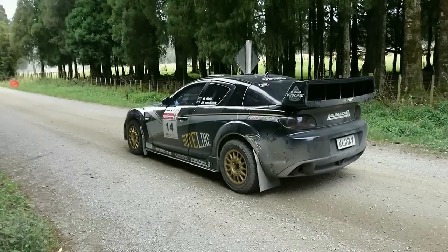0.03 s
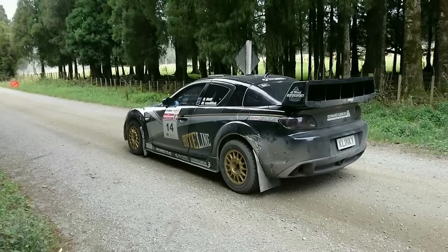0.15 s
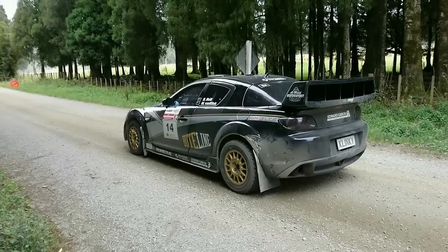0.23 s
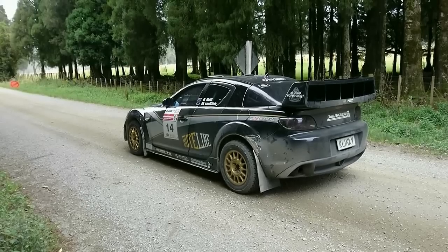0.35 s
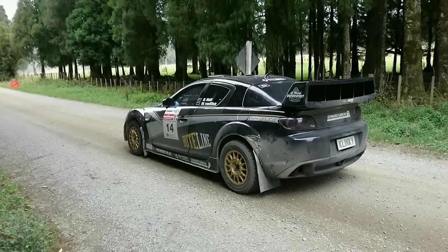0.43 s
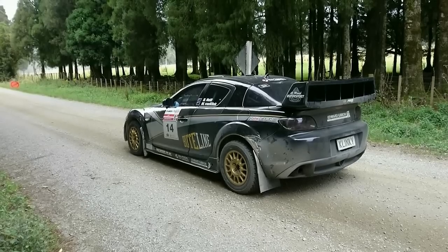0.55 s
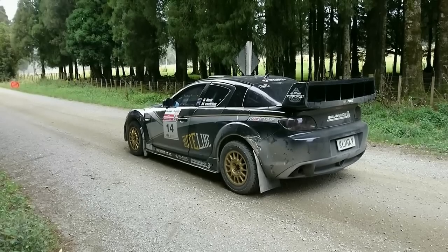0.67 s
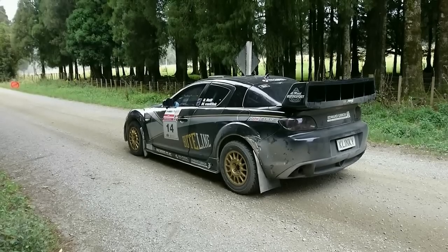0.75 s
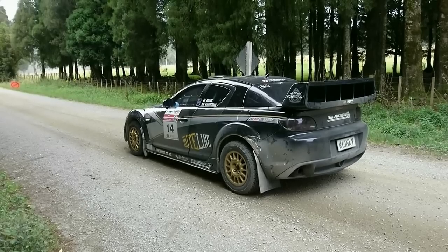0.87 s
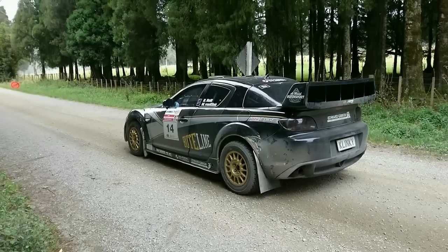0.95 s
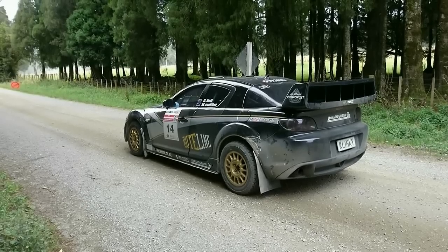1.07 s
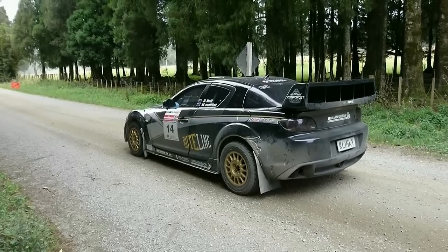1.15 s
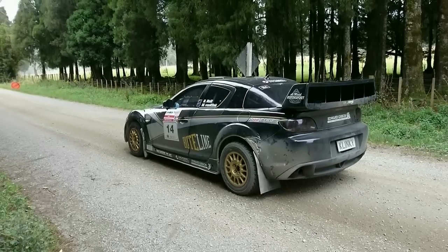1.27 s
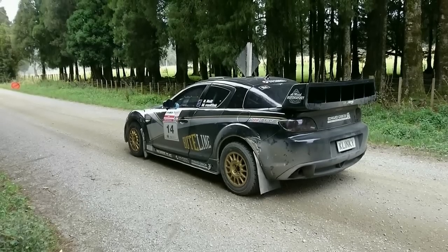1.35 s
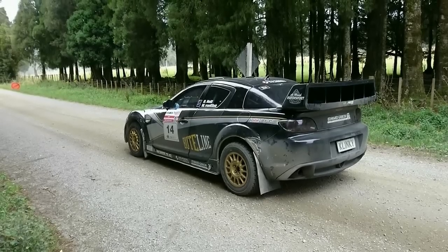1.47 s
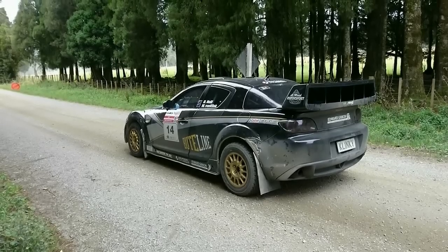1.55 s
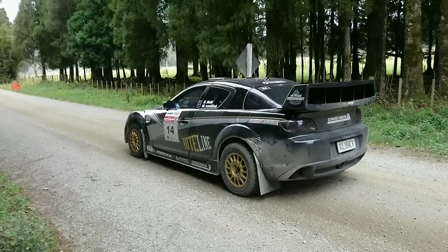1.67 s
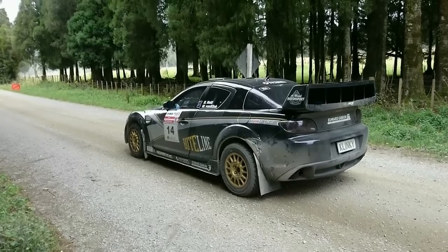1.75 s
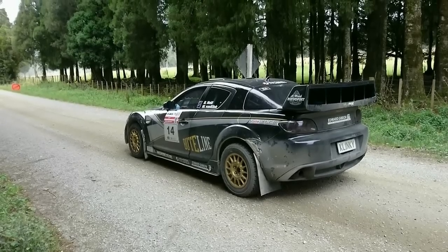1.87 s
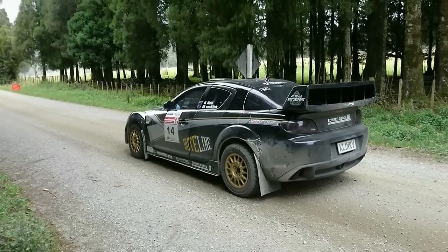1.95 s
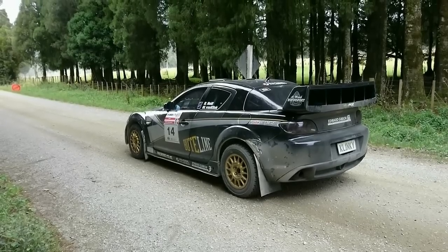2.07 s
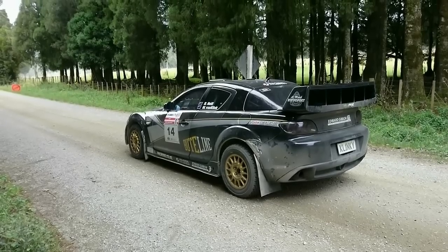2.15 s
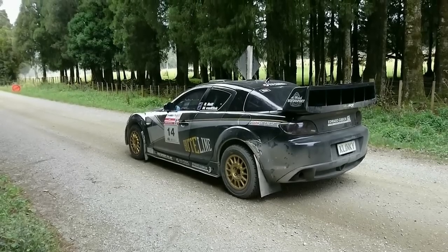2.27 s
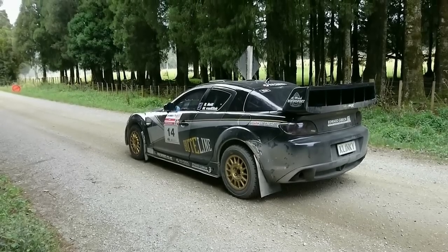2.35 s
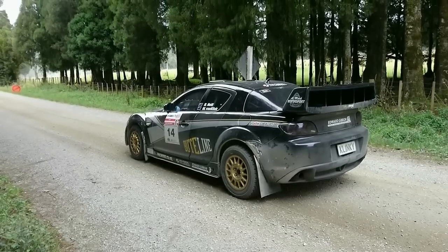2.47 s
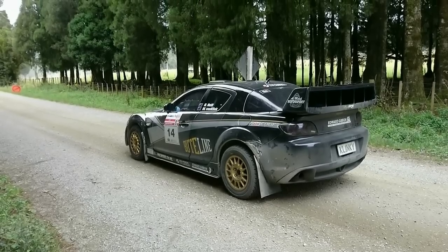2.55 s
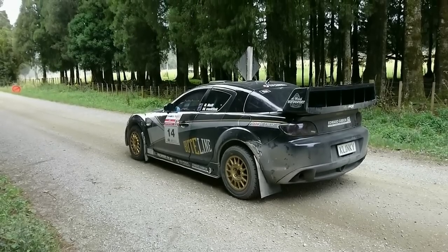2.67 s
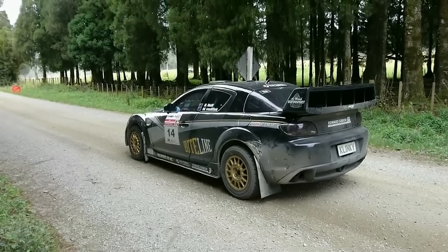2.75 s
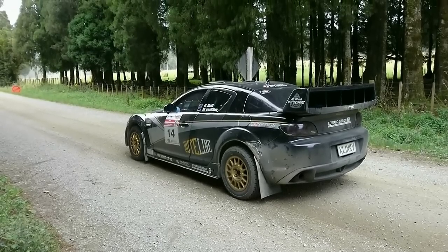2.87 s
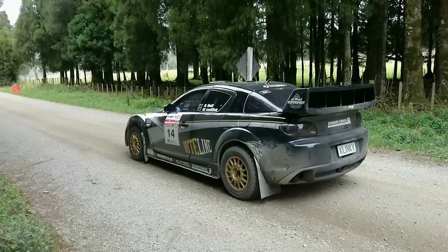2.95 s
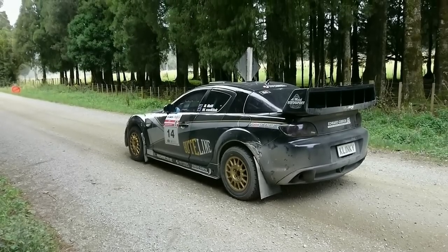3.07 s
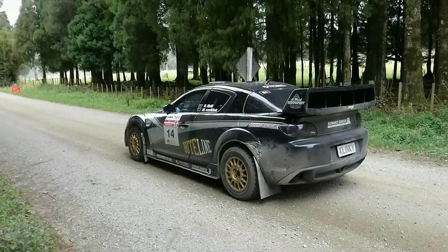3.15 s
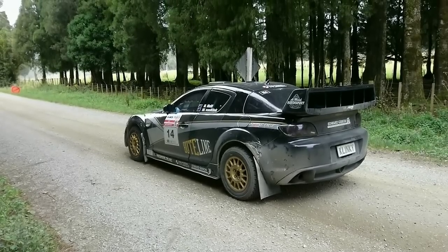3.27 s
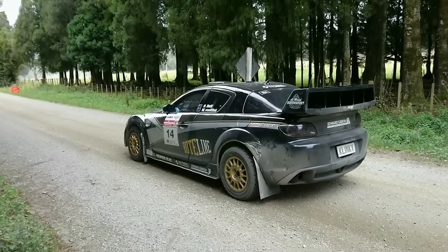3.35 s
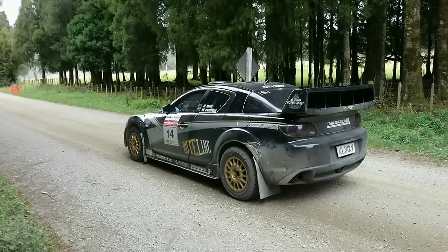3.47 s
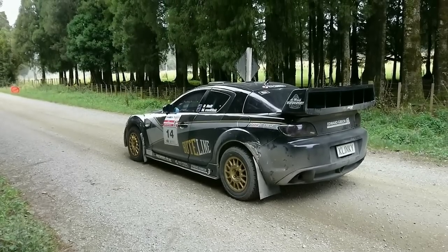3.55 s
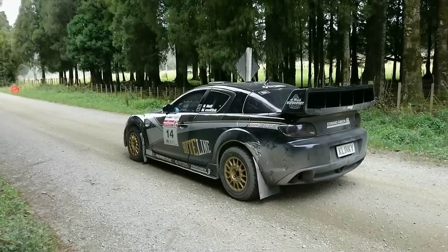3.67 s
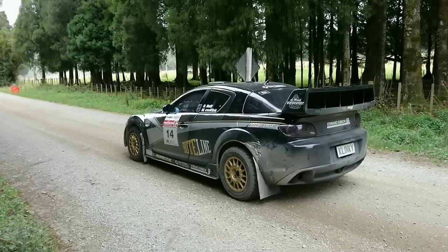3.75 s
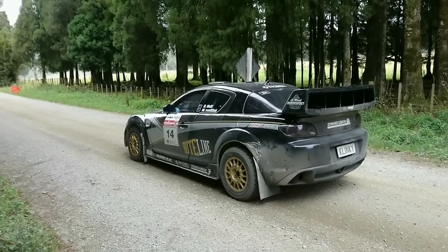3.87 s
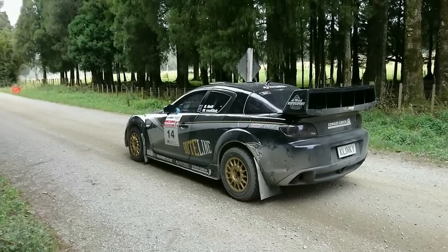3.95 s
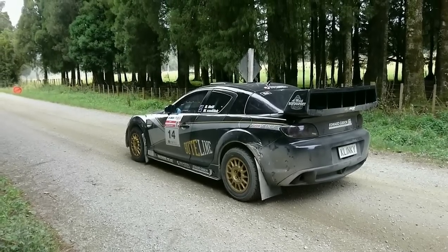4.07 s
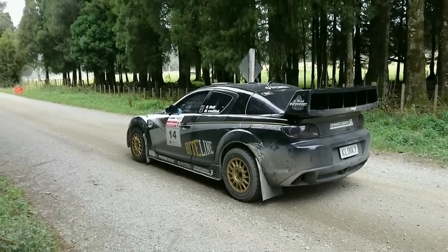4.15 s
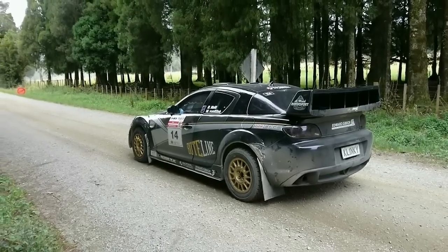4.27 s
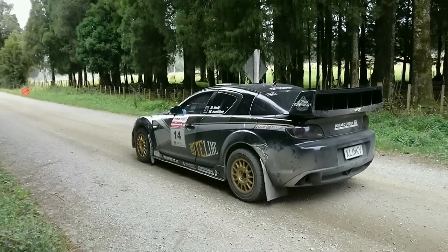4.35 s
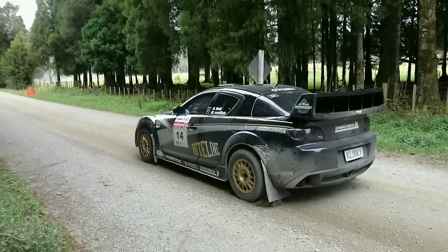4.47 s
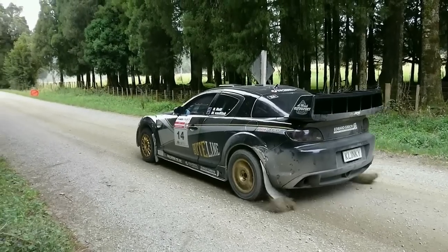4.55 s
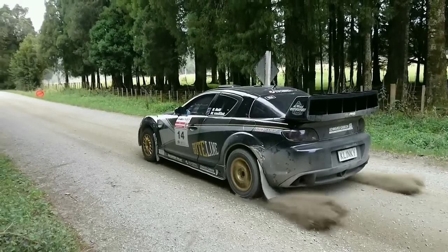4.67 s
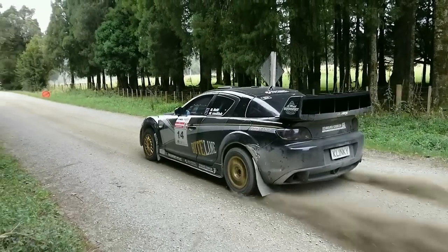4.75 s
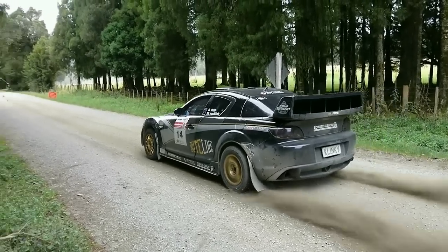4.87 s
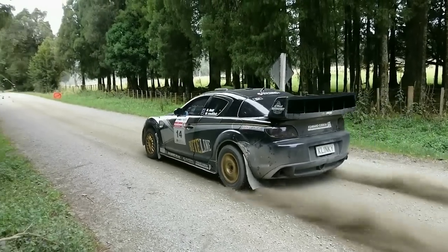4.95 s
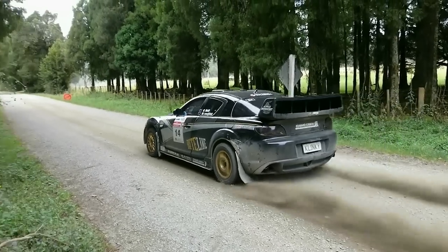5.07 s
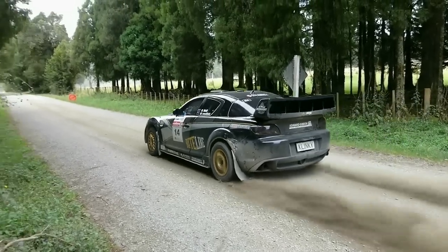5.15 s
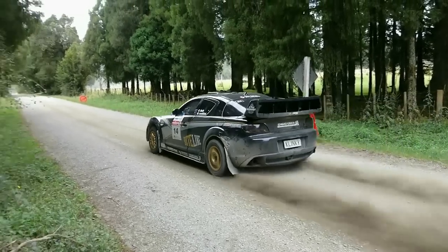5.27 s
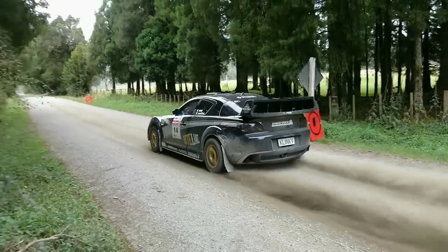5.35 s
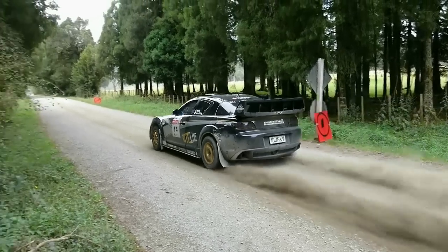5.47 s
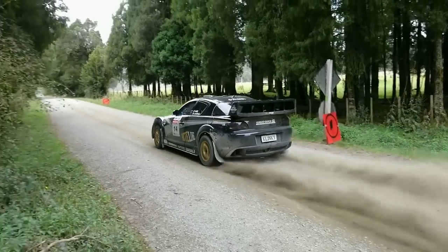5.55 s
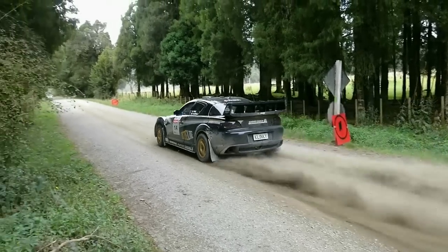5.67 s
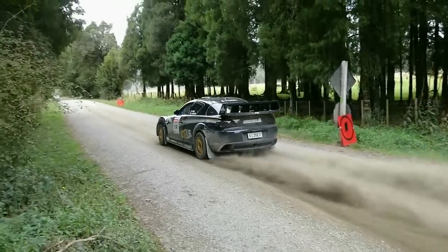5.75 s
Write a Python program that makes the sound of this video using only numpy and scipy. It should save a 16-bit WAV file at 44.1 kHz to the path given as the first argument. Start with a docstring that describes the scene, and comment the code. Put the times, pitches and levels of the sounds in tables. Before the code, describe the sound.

A rally car idles with a lumpy, raspy brap, is revved in sharp popping blips, then launches on gravel and pulls away with a hard buzzing howl.

```python
"""A rotary-engined rally car idles with a lumpy brap on a gravel road beside tall trees.
Sharp blips of the throttle end in pops and stutters; then it launches, throws gravel and pulls away.
Each firing is a pressure pulse that rings the exhaust and drives a puff of gas noise.
Stones are random ticks over grit noise, and the trees add a dull tail of echoes."""
import sys
import numpy as np
from scipy import signal
from scipy.fft import rfft, irfft, next_fast_len
from scipy.io import wavfile
from scipy.ndimage import uniform_filter1d

SR = 44100
rng = np.random.default_rng(int(sys.argv[2]) if len(sys.argv) > 2 else 0)


def dump_mix(stems):
    """Bounce the given channels to the path in sys.argv[1] as a 16-bit WAV at rate SR."""
    frames = np.atleast_2d(stems).T  # one column per channel
    limited = np.clip(frames, -1, 1)  # hard clip at full scale
    pcm = np.round(limited * 32767).astype(np.int16)
    wavfile.write(sys.argv[1], SR, pcm)


N = 256617  # length in samples

# Single hard firings and afterburn pops. Each row: time in seconds, peak in dB against the other pops.
POPS = [(0.471, -2.5), (0.601, -3.5), (0.834, 0), (1.723, -7), (1.759, -4.5), (1.814, -7.5), (1.845, -1),
        (2.222, -11.5), (2.443, -9.5), (2.534, -16), (2.584, -4), (2.613, -4.5), (2.68, -13.5), (2.719, -3),
        (3.08, -17), (3.116, -4), (3.47, -12.5), (3.557, -6), (3.746, -9.5), (3.802, -10), (3.832, -6.5),
        (3.862, -11), (4.155, -6.5)]
# Stones thrown by the spinning tyres. Each row: time in seconds, level in dB.
SPRAY = [(4.15, -90), (4.25, -50), (4.55, -49.5), (4.68, -40), (4.82, -42.5), (5.13, -56), (5.2, -44.5),
         (5.3, -60), (5.82, -55)]
# How the exhaust colours each of its voices, from low to high.
# Each row: frequency in Hz, relative response in dB.
BOOM_RESPONSE = [(20, -46), (38, -26), (55, 4.5), (66, 10.5), (82, 1.5), (103, 7.5), (122, -8), (145, -19),
                 (200, -17), (320, -81)]
NOTE_RESPONSE = [(110, -44.5), (200, -13.5), (250, -14.5), (300, -13), (345, -3.5), (425, 6), (490, 0.5),
                 (565, -1), (630, -3), (690, -12.5), (750, -42), (900, -39.5), (1500, -71.5)]
BARK_RESPONSE = [(450, -50.5), (720, -4.5), (790, 1.5), (865, 8), (980, 9), (1020, 1), (1100, 10),
                 (1200, -4), (1340, 0.5), (1480, -7), (1660, -3), (1950, -19.5), (2600, -44.5),
                 (5000, -132)]
RASP_RESPONSE = [(1000, -7), (1750, -20.5), (2100, -6), (2400, 3), (2600, -1.5), (2750, -1), (3000, -1.5),
                 (3350, 2), (4300, -10.5), (6000, -21), (8000, -73.5), (11000, -83)]
# The colour of the noises. Each row: frequency in Hz, relative level in dB per Hz.
HISS_SPECTRUM = [(700, -17), (1800, 1.5), (3300, -12), (4400, -8.5), (5200, -5.5), (6000, -1.5), (7100, -5),
                 (8000, -15), (9200, -33), (11000, -40.5), (16000, -71)]
SIZZLE_SPECTRUM = [(5000, -22.5), (8500, 21), (10500, 3), (12500, 15.5), (14000, 17), (15700, -9.5)]
STONE_SPECTRUM = [(600, -3), (2000, -2), (6000, -0.5), (9000, 8.5), (11000, 4), (13000, 5.5), (15000, 15),
                  (16000, -6.5)]
# Where each voice sits before the car's own pan is added. Each entry: left minus right in dB,
# amount of scattered sound that differs between the sides (0-1, held to 0.9 at most).
PLACE = {"boom": (-3.3, .01), "note": (-3.27, 0.07), "bark": (-.3, 0.4), "rasp": (-10, 0.66),
         "hiss": (-10.5, 0.95), "top": (-5.5, .3)}
# The misfire rhythm. Each row: rate in cycles per firing, width in cycles per firing, level in dB.
LOPE = [(.275, 0.0053, -2.5), (.46, 0.34, -2.5)]
# Strength of the three rotors in firing order, in dB.
ROTORS_DB = [1.0, -0.15, -0.97]
# Pipe resonances that lift one overtone as it sweeps through. Each row: harmonic number, centre in Hz,
# half width in Hz, dB above the gas hiss at the launch, change in dB per second.
HOWL = [(2, 675, 54, 12, 9.5), (3, 1235, 117, 9, -1)]
# Reflections inside the silencer. Each row: round trip in seconds, share sent back (0-1).
SILENCER = [(.00235, 0.51), (0.00136, 0.43), (.0039, 0.33)]
# The nasal ring of the tailpipe. Each row: frequency in Hz, relative response in dB.
TAILPIPE_RESPONSE = [(1500, -43.5), (2250, 0.5), (2450, 5.5), (2600, -4), (2780, 8.5), (2950, -1),
                     (3250, -13.5), (4200, -56.5)]
# Echo off the bank, whose path shortens as the car leaves. Each row: time in s, extra travel in s.
BANK = [(0, 0.0079), (4.3, 0.0095), (4.9, 0.0075), (5.4, .0058), (5.82, 0.0043)]
# The idle hunts a little. Each row: time in seconds, firings per second in Hz.
IDLE_SPEED = [(0.0, 138.9), (0.4, 143.5), (0.8, 140.5), (1.08, 144.7)]
# The exhaust at idle: boom, pipe note, bark and gas hiss in dB, roughness (0-1).
IDLE = (-18, -12.5, -27, -46, 0.55)
# Throttle blips, with the exhaust once the pedal is fully down, before the note thins.
# Each row: start in seconds, length in seconds, time to press the pedal in seconds,
# firings from Hz, to Hz (before the rev limit), boom, pipe note, bark and gas hiss in dB, roughness (0-1).
BLIPS = [(1.078, 0.57, .38, 145.3, 183.9, -20, -11.5, -23, -38, 0.29),
         (1.841, .28, .17, 144, 248.5, -24.5, -10, -21, -33, 0.14),
         (2.242, 0.11, 0.01957, 215.2, 279.8, -31.5, -9.5, -21, -32, 0.16),
         (2.774, .19, .1, 162.4, 262.2, -25.5, -10, -20.5, -32, 0.14),
         (3.106, 0.28, 0.02042, 219.5, 290.2, -28, -10.5, -23, -36.5, 0.15),
         (3.549, 0.11, 0.021, 225.5, 235.7, -19, -10.5, -23, -38.5, 0.48),
         (3.878, .192, .06, 181.7, 380.6, -36, -9.5, -16.5, -29, 0.13)]
# After every lift the fuel is cut; the pipe booms and empties, then it burbles. Each row: seconds since
# the lift, boom, pipe note, bark and gas hiss in dB (hiss before fast revs add to it), roughness (0-1).
OVERRUN = [(.028, -21, -26.5, -39, -48, .4), (.07, -30, -29, -45.5, -51, 0.57),
           (0.109, -18.5, -20.5, -34.5, -50.5, 0.8), (.35, -20, -17, -34, -44, 0.7)]
# Revs flare with wheelspin, sag as the tyres grip and climb again.
# Each row: time in seconds, firings per second in Hz, before the revs waver.
LAUNCH_SPEED = [(4.17, 322.3), (4.224, 335.3), (4.268, 365.6), (4.306, 414.4), (4.324, 433.6),
                (4.392, 461.8), (4.496, 417.3), (4.542, 386), (4.592, 336.5), (4.65, 360), (4.672, 351.7),
                (4.896, 396.9), (5.054, 425), (5.19, 436.4), (5.582, 403.1), (5.7, 383.8), (5.8, 379)]
# The exhaust as the car pulls away, before the voice levels and the stumble.
# Each row: time in seconds, pipe note, bark and gas hiss in dB.
LAUNCH = [(4.17, -15, -22, -47.5), (4.228, -14, -15.5, -30.5), (4.32, -9.5, -22.5, -35),
          (4.37, -10.5, -15.5, -30.5), (4.472, -9, -20, -35.5), (4.528, -11.5, -31, -36),
          (4.554, -10.5, -19, -42), (4.582, -19, -21, -36), (4.866, -9.5, -19.5, -38),
          (5.054, -8.5, -30.5, -42.5), (5.192, -6, -26, -43), (5.248, -9.5, -27, -47.5),
          (5.518, -13.5, -30.5, -45), (5.56, -13.5, -36, -47), (5.656, -18.5, -30, -48.5),
          (5.819, -23, -38.5, -45)]
# Level of each voice throughout the launch, added to the rows: pipe note, bark and gas hiss in dB.
LAUNCH_VOICE_DB = (0.5, 0.5, 3.5)
# The boom dies under load and returns as a soft hum. Each row: time in seconds, level in dB.
LAUNCH_BOOM = [(4.16, -21), (4.23, -33), (4.39, -37), (4.46, -46), (4.83, -40), (5.08, -49.5), (5.3, -41.5),
               (5.82, -35)]
# Swell of the tailpipe's ring as the tyres fight for grip. Each row: time in s, dB against the gas hiss.
BLARE = [(4.22, -35), (4.38, -7), (4.47, -12), (4.57, -1), (4.76, -6), (5.05, -19), (5.82, -5)]
# Each pop sets off a few strong firings: boom, pipe note, bark and gas hiss in dB against the pop's peak.
FLARE_DB = (-11.5, -9, -24.5, -42.5)
# Place of the whole car. Each row: time in seconds, left minus right in dB.
PAN = [(.7, 2), (1.25, 0), (4.5, 0.76), (5.25, -1.5)]

FOREST_T60_S, FOREST_DB = 0.6, -20  # time for the tail to fall by 60 dB, and its level
STONES_PER_S = 2500  # at the height of the spray
CUTOFF_HZ = 15750  # top of the sound
PEDAL_FIRST_SHARE = 0.28  # share of the pedal's travel taken at the first touch
OPEN_S, SHUT_S = 0.017, 0.024  # time the exhaust takes to follow the throttle
LIMITER_HZ = 354  # the rev limit in the blips, in firings per second
COAST_BEND = 0.75  # under 1: the revs fall fastest just after the lift
LAUNCH_S = 4.15
STUMBLE_S, STUMBLE_WIDTH_S = 4.386, 0.008  # one stumble during the wheelspin
STUMBLE_ROUGH, STUMBLE_DIP_DB = 0.53, 4
# combustion is ragged as the clutch bites, then more even under load
LAUNCH_ROUGH, BITE_ROUGH, BITE_S = 0.11, 0.32, 0.051
WAVER_SHARE, WAVER_HZ = 0.004, 14  # the tyres slip and grip, so the revs waver
# around these revs no overtone sits on the pipe's main resonance, and its note thins
THIN_HZ, THIN_WIDTH_HZ, THIN_DB = 287, 25, 3
# above these revs the engine pumps more gas while it coasts
OVERRUN_HISS_DB_PER_HZ, OVERRUN_FAST_HZ = 0.11, 235
FLARE_RISE_S, FLARE_HOLD_S, FLARE_FADE_DB_PER_S = 0.0026, 0.016, 550.5


def from_db(db):
    """Turn decibels into gain."""
    return 10 ** (np.asarray(db) / 20)


def rms_one(x):
    """Scale to unit power."""
    return x / np.sqrt(np.mean(x ** 2) + 1e-20)


def in_time(rows):
    """Draw straight lines between the rows, giving each column at every sample."""
    s, *columns = np.transpose(rows)
    return [np.interp(np.arange(N) / SR, s, c) for c in columns]


def ramp(start_s, length_s):
    """Rise from 0 to 1 in a straight line and stay there."""
    return np.clip((np.arange(N) / SR - start_s) / max(length_s, 0.001), 0, 1)


def through(x, response):
    """Filter with the given response, sounding as early as physics allows (minimum phase)."""
    size = next_fast_len(N + SR // 4, True) // 2 * 2
    hz, db = np.transpose(response)
    grid = np.maximum(np.arange(size // 2 + 1) * SR / size, 1)
    rolloff_db = 12 * np.log2(np.maximum(grid / hz[-1], 1))  # 12 dB per octave above the last row
    gain_db = np.interp(np.log(grid), np.log(hz), db) - rolloff_db
    # folding the cepstrum forward in time gives the phase that fits the gain
    cepstrum = irfft(np.log(from_db(gain_db)))
    cepstrum[1:size // 2] *= 2
    cepstrum[size // 2 + 1:] = 0
    return irfft(rfft(x, size) * np.exp(rfft(cepstrum)))[..., :N]


def evened(x, span_s):
    """Hold near unit power over each short span; faster throbs stay."""
    size = max(int(span_s * SR), 8)
    power = np.mean(np.atleast_2d(x) ** 2, axis=0)
    smooth_power = uniform_filter1d(uniform_filter1d(power, size), size)
    return x / np.sqrt(np.abs(smooth_power) + 1e-14)


def slow_noise(top_hz):
    """Make a random waver of unit power, slower than top_hz."""
    lowpass = signal.butter(2, top_hz, fs=SR, output="sos")
    return rms_one(signal.sosfilt(lowpass, rng.standard_normal(N)))


def clicks(at, heights):
    """Place impulses between samples by spreading each over a short windowed sinc."""
    out, taps = np.zeros(N), np.arange(-7, 9)
    index = np.floor(at).astype(int)[:, None] + taps
    offset = index - at[:, None]
    shape = np.sinc(offset) * np.sinc(offset / 8)
    np.add.at(out, np.clip(index, 0, N - 1), heights[:, None] * shape)
    return out


def scatter(x, t60, delay_s):
    """Add up a dense cluster of dying reflections, of unit power."""
    t = np.arange(int(t60 * SR)) / SR
    echoes = rng.standard_normal(len(t)) * from_db(-60 * t / t60) * (t > delay_s)
    return signal.fftconvolve(x, echoes / np.linalg.norm(echoes))[:N]


def placed(x, name):
    """Pan a voice; reflections off road and bodywork make the two sides differ."""
    pan_db, spread = PLACE[name]
    reflections = scatter(np.atleast_2d(x).mean(axis=0), t60=0.07, delay_s=0.001)
    side = np.clip(spread, 0, 0.9) * reflections * np.array([[1], [-1]])
    gains = from_db(np.array([[pan_db], [-pan_db]]) / 2)
    return (x + side) * gains / gains.mean()


def forest(x):
    """The trunks send back a dull, diffuse tail."""
    band = signal.butter(1, [180, 3500], "band", fs=SR, output="sos")
    dull = signal.sosfilt(band, x.mean(axis=0))
    tails = [scatter(dull, FOREST_T60_S, delay_s=0.034) for side in range(2)]
    return from_db(FOREST_DB) * np.array(tails)


def gravel(size_spread_db=2.5, grit=0.5):
    """Stones tick on the road and the underbody over a hiss of grit."""
    level_db, = in_time(SPRAY)
    per_s = STONES_PER_S * np.sqrt(from_db(level_db - level_db.max()))
    sizes = from_db(size_spread_db * np.minimum(rng.exponential(1, N), 4)) * rng.standard_normal(N)
    hits = sizes * (rng.random(N) < per_s / SR)
    ticks = scatter(hits, t60=0.006, delay_s=0)
    ticks = rms_one(ticks / np.sqrt(np.abs(per_s) + 1))  # fewer stones do not sound weaker yet
    stones = through(ticks + grit * rng.standard_normal(N), STONE_SPECTRUM)
    return placed(from_db(level_db) * rms_one(stones), "top")


def pops(level_db=-7.0, bark_db=-18.0, crack_db=-36.0):
    """Unburnt fuel goes off in the pipe and rings the same resonances."""
    s, peak_db = np.transpose(POPS)
    bangs = clicks(s * SR, from_db(peak_db))
    out = through(bangs, NOTE_RESPONSE)
    out = out + from_db(bark_db) * through(bangs, BARK_RESPONSE)
    out = out + from_db(crack_db) * through(bangs, RASP_RESPONSE)
    return placed(out * from_db(peak_db.max() + level_db) / np.abs(out).max(), "note")


def missed_firings(gap_s=0.0088, depth=0.41):
    """The engine falters just before each pop, so its level dips."""
    before_s = np.transpose(POPS)[0][:, None] - np.arange(N) / SR
    dips = np.clip(before_s / 0.00067, 0, 1) * np.clip(2 - before_s / gap_s, 0, 1)
    return 1 - depth * dips.max(axis=0)


def bank_echo(x, share=0.3):
    """Direct and reflected sound interfere, so overtones swell and fade as pitch and distance change."""
    lag_s, = in_time(BANK)
    n = np.arange(N)
    return x + share * np.interp(n - lag_s * SR, n, x, left=0)


def silencer(x):
    """Each chamber smears a pulse into a train of echoes without colouring it (an all-pass filter)."""
    for trip_s, share in SILENCER:
        delay = np.exp(-2j * np.pi * np.arange(N + 1) * trip_s * SR / (2 * N))
        share = np.clip(share, 0, 0.8)
        x = irfft(rfft(x, 2 * N) * (delay - share) / (1 - share * delay))[:N]
    return x


def pedal(start_s, press_s):
    """The pedal takes a first touch, then goes ever faster down to the end of its travel."""
    return PEDAL_FIRST_SHARE + (1 - PEDAL_FIRST_SHARE) * ramp(start_s, press_s) ** 2


def engine_speed():
    """Revs climb as fast as the pedal is deep, then coast down until the throttle opens again."""
    t = np.arange(N) / SR
    hz, = in_time(IDLE_SPEED)
    following = [(row[0], row[3]) for row in BLIPS[1:]] + [(LAUNCH_S, LAUNCH_SPEED[0][1])]
    for (start, length, press, from_hz, to_hz, *_), (next_s, next_hz) in zip(BLIPS, following):
        lift = start + length
        work = np.cumsum(pedal(start, press) * ramp(start, 0) * (1 - ramp(lift, 0)))
        climb = np.minimum(from_hz + (to_hz - from_hz) * work / work[-1], LIMITER_HZ)
        coast = ramp(lift, next_s - lift) ** COAST_BEND
        hz = np.where(t < start, hz, climb + (next_hz - climb) * coast)
    launch_hz = in_time(LAUNCH_SPEED)[0] * (1 + WAVER_SHARE * slow_noise(WAVER_HZ))
    return np.where(t < LAUNCH_S, hz, launch_hz)


def launch_state():
    """Under load the exhaust has a ragged bite, one stumble, then a clean pull."""
    stumble = np.exp(-((np.arange(N) / SR - STUMBLE_S) / STUMBLE_WIDTH_S) ** 2)
    voices_db = in_time(LAUNCH) + np.array(LAUNCH_VOICE_DB)[:, None] - STUMBLE_DIP_DB * stumble
    rough = LAUNCH_ROUGH + BITE_ROUGH * (1 - ramp(LAUNCH_S, BITE_S)) + STUMBLE_ROUGH * stumble
    return np.vstack([in_time(LAUNCH_BOOM), voices_db, rough])


def exhaust_state(firing_hz):
    """Boom, note, bark and hiss in dB, and roughness, follow idle, throttle and overrun, then launch."""
    idle = np.array(IDLE)[:, None]
    state = idle * np.ones(N)
    thin_db = THIN_DB * np.exp(-((firing_hz - THIN_HZ) / THIN_WIDTH_HZ) ** 2)
    pumping_db = OVERRUN_HISS_DB_PER_HZ * np.maximum(firing_hz - OVERRUN_FAST_HZ, 0)
    for start, length, press, _, _, *pressed in BLIPS:
        lift = start + length
        driven = idle + (np.array(pressed)[:, None] - idle) * pedal(start, press)
        driven[1] -= thin_db
        coasting = np.array(in_time([(lift + s, *row) for s, *row in OVERRUN]))
        coasting[3] += pumping_db
        state += (driven - state) * ramp(start, OPEN_S)
        state += (coasting - state) * ramp(lift, SHUT_S)
    return state + (launch_state() - state) * ramp(LAUNCH_S, OPEN_S)


def flared(levels_db):
    """After each pop the engine catches for a few firings, then falls back."""
    t = np.arange(N) / SR
    flares = []
    for s, peak_db in POPS:
        fade_db = FLARE_FADE_DB_PER_S * np.maximum(t - s - FLARE_HOLD_S, 0)
        flares.append(ramp(s, FLARE_RISE_S) * from_db(peak_db - fade_db))
    flare_db = 20 * np.log10(np.max(flares, axis=0) + 1e-9)
    return np.maximum(levels_db, flare_db + np.array(FLARE_DB)[:, None])


def firings(firing_hz, rough, chance=0.85, timing=0.051):
    """Give each pulse a sample position and a strength, uneven by chance, misfire rhythm and rotor."""
    turns = np.cumsum(firing_hz) / SR
    at = np.interp(np.arange(1, int(turns[-1])), turns, np.arange(N))
    draws = rng.standard_normal((len(at), 4))
    swing = chance * draws[:, 0]
    for k, (cycles, width, level_db) in enumerate(LOPE):
        r = np.exp(-np.pi * abs(width))
        resonator = [1, -2 * r * np.cos(2 * np.pi * cycles), r * r]
        swing = swing + from_db(level_db) * rms_one(signal.lfilter([1], resonator, draws[:, k + 1]))
    uneven = np.clip(rough[at.astype(int)], 0, 1)
    strength = np.maximum(1 + 1.04 * uneven * rms_one(swing), 0.2)
    strength = strength * from_db(np.resize(ROTORS_DB, len(at)))
    # the rougher the burning, the further pulses come off the beat, early or late
    shift = timing * (uneven + 0.019) * draws[:, -1] * SR / firing_hz[at.astype(int)]
    return at + shift, strength


def gas_puffs(pulses, puff_s=0.0028, steady=1.0, apart=0.61):
    """Turbulence flares with each pulse, partly different on the two sides."""
    flare = evened(signal.lfilter([1], [1, -np.exp(-1 / (puff_s * SR))], pulses), 0.16)
    noise = rng.standard_normal(N) + apart * rng.standard_normal((2, N))
    return evened((flare + steady) * noise, 0.18)


def shaft_hum(turns, unsteady=0.41):
    """The shaft throbs once per turn, that is per three firings."""
    return np.sqrt(2) * np.sin(2 * np.pi * turns / 3) * (1 + unsteady * slow_noise(25))


def howling(firing_hz, turns):
    """Overtones swell while their pitch lies on a pipe resonance."""
    since_s = np.arange(N) / SR - LAUNCH_S
    out = np.zeros(N)
    for harmonic, hz, width_hz, db, db_per_s in HOWL:
        k = round(harmonic)
        resonance = 1 / (1 + ((k * firing_hz - hz) / width_hz) ** 2)
        out += from_db(db + db_per_s * since_s) * resonance * np.sin(2 * np.pi * k * turns)
    return np.sqrt(2) * out


def engine():
    """Firing pulses ring the exhaust; strong ones steepen and feed the upper voices most."""
    firing_hz = engine_speed()
    *levels_db, rough = exhaust_state(firing_hz)
    boom_db, note_db, bark_db, hiss_db = flared(levels_db)
    turns = np.cumsum(firing_hz) / SR  # counted in firings
    revved = np.clip((firing_hz - 290) / 70, 0, 1)  # 0 at low revs, 1 at high revs

    at, strength = firings(firing_hz, rough)
    pulses = evened(silencer(clicks(at, strength)), 0.047)
    sharp = clicks(at, strength ** 1.23)
    edge = evened(bank_echo(silencer(sharp)), 0.22)
    gas = gas_puffs(sharp)
    ragged = rough * gas  # ragged burning blows more turbulence

    # at high revs the lumpy boom gives way to a smooth hum
    smooth = 0.96 * revved
    lumpy = evened(through(pulses, BOOM_RESPONSE), 0.042)
    boom = from_db(boom_db) * (np.sqrt(1 - smooth) * lumpy + np.sqrt(smooth) * shaft_hum(turns))

    note = evened(through(pulses + 0.93 * ragged.mean(axis=0), NOTE_RESPONSE), 0.015)
    howl = from_db(hiss_db) * ramp(LAUNCH_S, OPEN_S) * revved * howling(firing_hz, turns)
    bark = from_db(bark_db) * evened(through(edge + 0.87 * ragged, BARK_RESPONSE), 0.039)

    # at high revs the rasp loses its sharpest edge
    softened = through(edge, [(1900, 1), (2900, 0), (3700, -9.5)])  # Hz, dB
    blunt = (1 - revved) * edge + revved * softened
    rasp_db = (bark_db + hiss_db) / 2 - 6 + 2 * revved
    rasp = from_db(rasp_db) * evened(through(blunt + 3.4 * ragged, RASP_RESPONSE), 0.091)

    hiss = from_db(hiss_db) * evened(through(gas_puffs(sharp) + 0.34 * edge, HISS_SPECTRUM), 0.18)
    blare_db = hiss_db + in_time(BLARE)[0]
    blare = from_db(blare_db) * evened(through(edge + 0.88 * gas, TAILPIPE_RESPONSE), 0.066)

    # the highest sizzle grows faster than the hiss as the gas speeds up, until the hiss reaches -36 dB
    sizzle_db = hiss_db - 17.5 + 0.47 * np.minimum(hiss_db + 36, 0)
    sizzle = from_db(sizzle_db) * evened(through(gas, SIZZLE_SPECTRUM), 0.05)

    voices = {"boom": boom, "note": from_db(note_db) * note + howl, "bark": bark,
              "rasp": rasp + blare, "hiss": hiss, "top": sizzle}
    return sum(placed(x, name) for name, x in voices.items())


def scene():
    """The car ends up to the right as it leaves, with the forest's tail and the gravel around it."""
    pan_db, = in_time(PAN)
    car = (engine() * missed_firings() + pops()) * from_db(np.array([pan_db, -pan_db]) / 2)
    return car + forest(car) + gravel()


def record(dry, top=0.67):
    """Round the loudest peaks toward a ceiling and cut the top of the treble."""
    rounded = dry / (1 + (dry / top) ** 8) ** (1 / 8)
    lowpass = signal.ellip(10, 0.1, 90, CUTOFF_HZ, fs=SR, output="sos")
    return signal.sosfilt(lowpass, rounded)


dry = scene()
out = record(dry)
dump_mix(out)
```